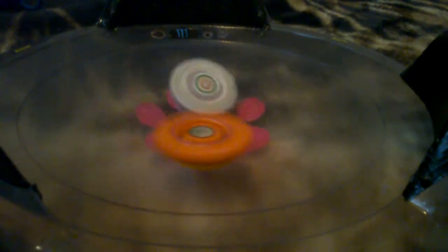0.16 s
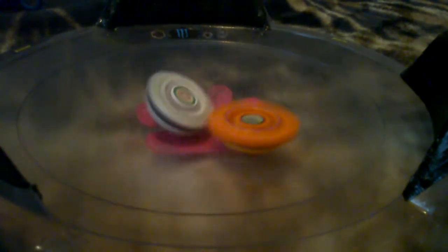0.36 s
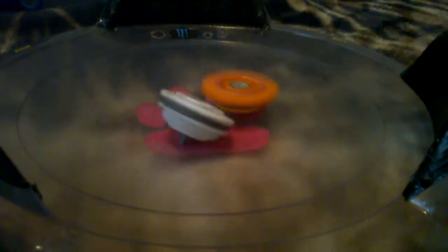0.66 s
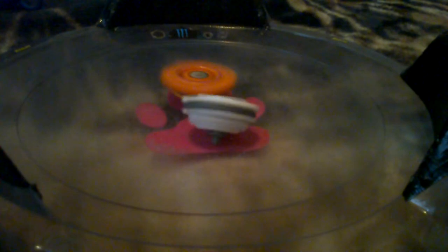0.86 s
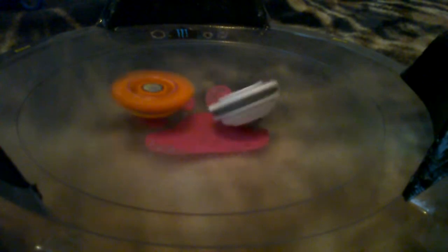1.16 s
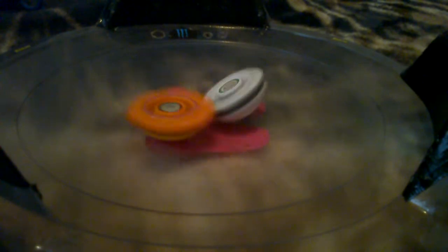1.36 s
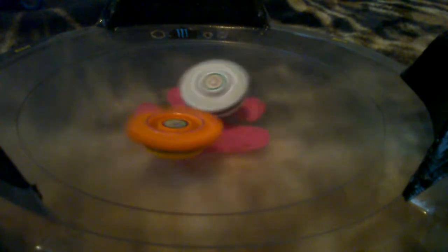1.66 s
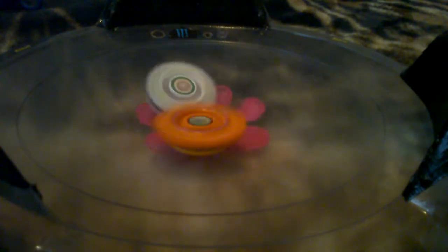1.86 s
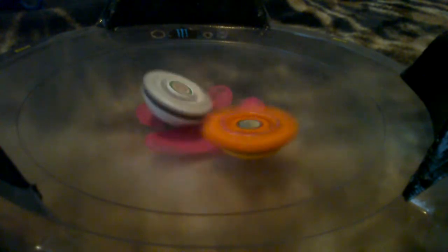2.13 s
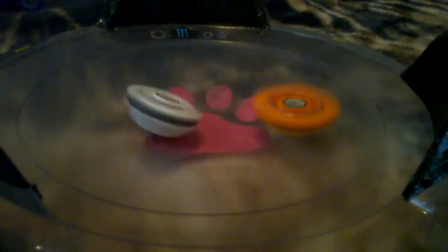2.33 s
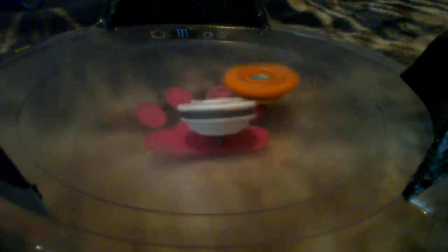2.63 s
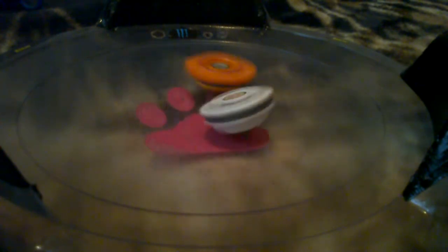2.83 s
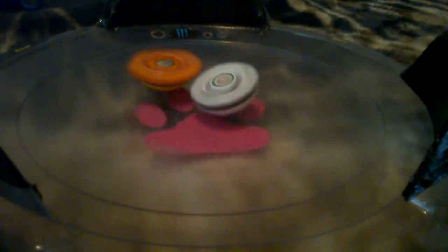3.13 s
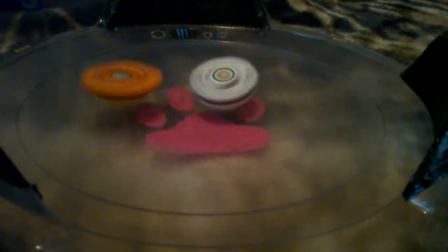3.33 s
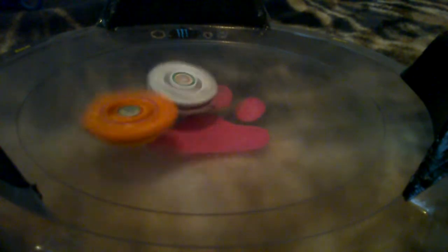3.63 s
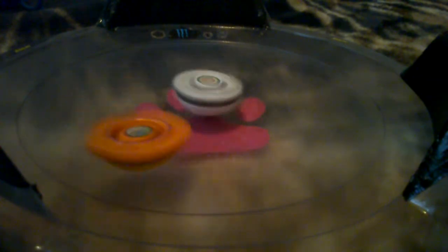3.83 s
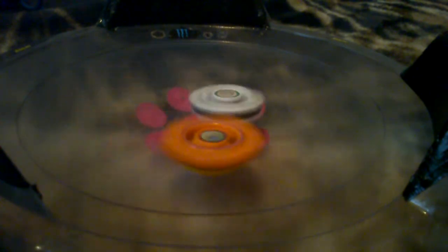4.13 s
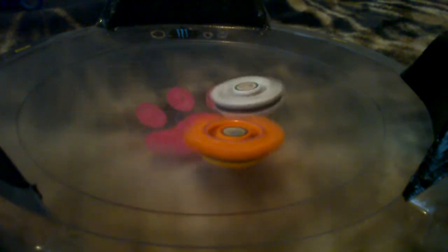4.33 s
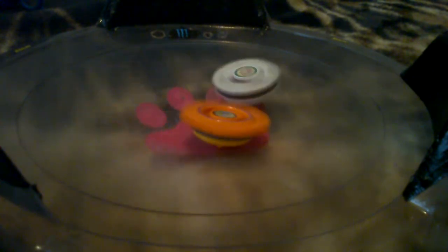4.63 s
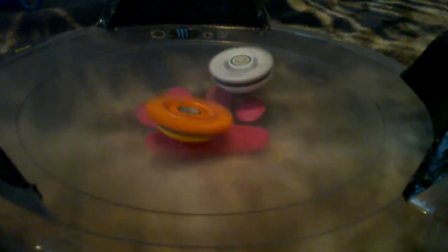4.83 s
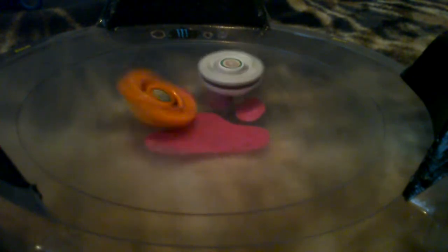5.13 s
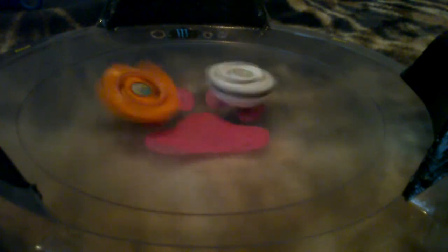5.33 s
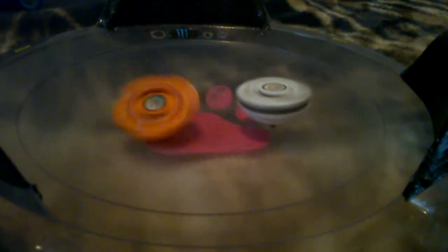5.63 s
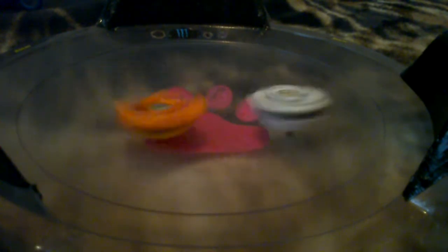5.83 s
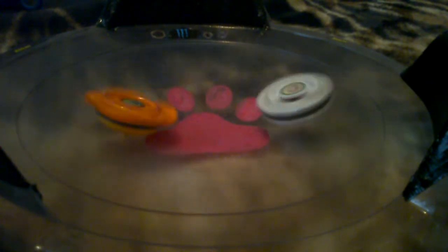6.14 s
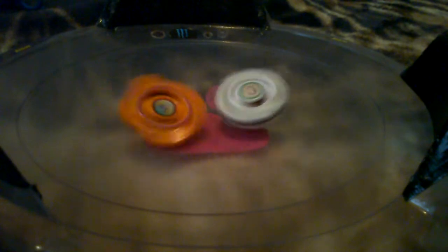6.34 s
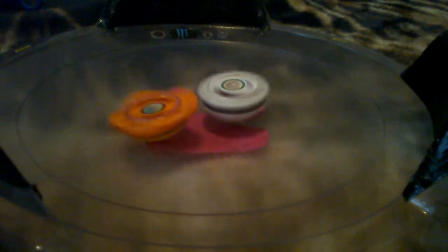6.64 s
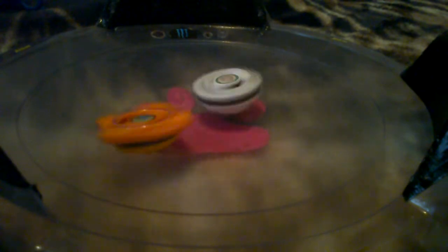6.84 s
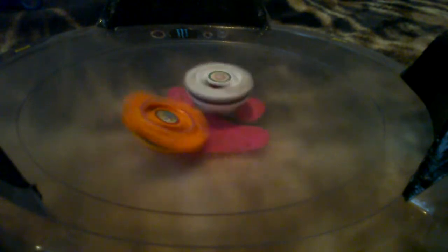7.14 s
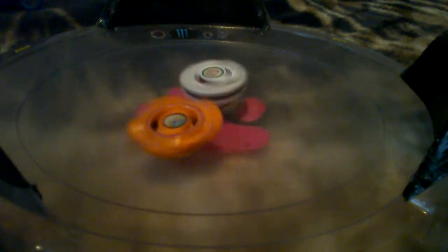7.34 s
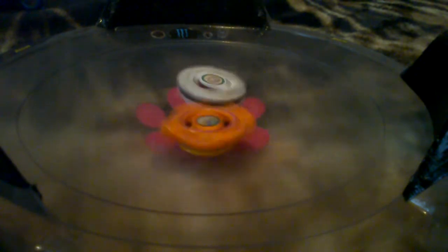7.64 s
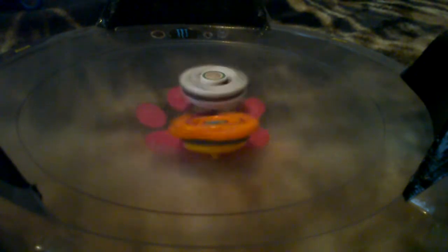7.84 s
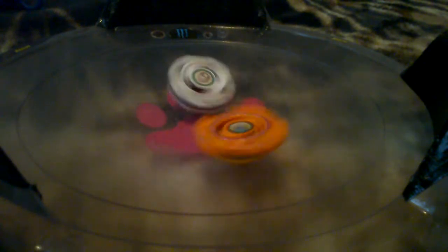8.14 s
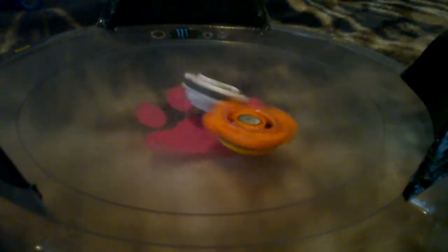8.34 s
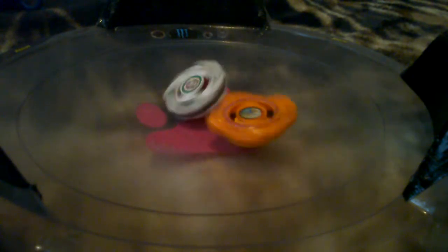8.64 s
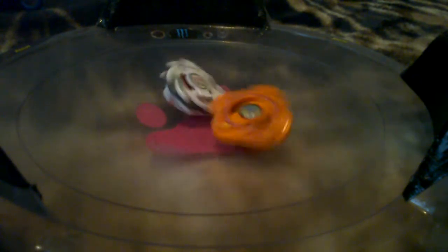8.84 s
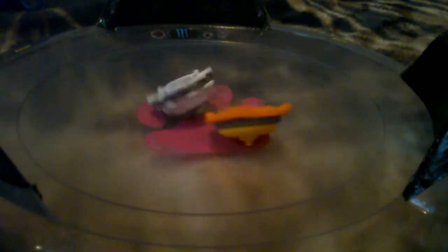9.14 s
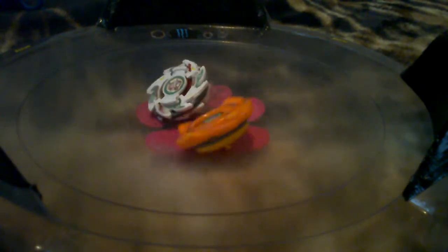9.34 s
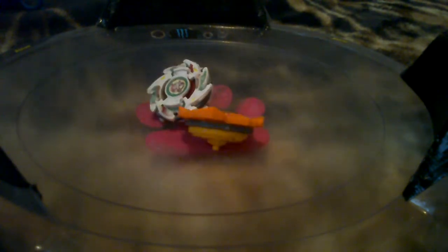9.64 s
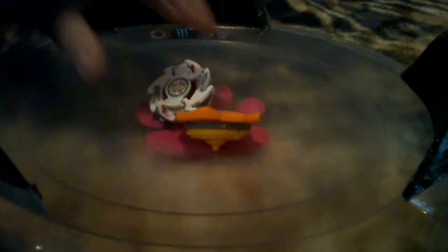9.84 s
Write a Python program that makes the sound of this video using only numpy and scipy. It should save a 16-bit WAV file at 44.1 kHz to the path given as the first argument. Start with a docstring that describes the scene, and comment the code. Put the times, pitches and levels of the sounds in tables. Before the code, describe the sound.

Close up in a small room, a tilted spinning top hammers a thin plastic bowl in a fast hollow rattle for about a second and a half. Sharp bright cracks follow as two tops clash, with fainter rapid tapping until three seconds. Then come scattered clashes over lumpy low rumble and rounded bumps, finishing in smaller, weaker clicks. A small camera microphone adds faint hiss and brief level dips.

```python
"""Quick hammering, sharp plastic cracks and low rumbling bumps: two spinning tops in a thin plastic bowl,
close to a small camera microphone in a small room. A tilted top hammers the bowl about once a turn, ringing its
decaying modes; clashing rims grind in short noise bursts; tips roll as lumpy noise and rock the bowl in rounded
low cycles. The room answers blows and clashes with noise tails, and the level dips briefly at times."""
import sys
import numpy as np
from scipy import signal
from scipy.fft import rfft, irfft, next_fast_len
from scipy.io import wavfile
from scipy.ndimage import uniform_filter1d, map_coordinates

SR = 44100
rng = np.random.default_rng(int(sys.argv[2]) if len(sys.argv) > 2 else 0)


def to_wav(sig):
    """Store sig (one row per channel, or 1-D mono) as 16-bit WAV at the path in sys.argv[1].

    Samples outside -1..1 are clipped; the rate is SR.
    """
    pcm = np.clip(np.atleast_2d(sig), -1, 1) * 32767
    pcm = np.round(pcm).astype(np.int16)
    wavfile.write(sys.argv[1], SR, pcm.T)  # frames by channels


N = 440541

# tips rolling on the floor: (time [s], rumble level [dB], whir level [dB])
ROLLING_LEVELS = [(0, -45, -41.5), (1.2, -40, -43.5), (1.6, -44.5, -44), (2.9, -44.5, -47),
                  (3.1, -35, -52.5), (3.5, -42, -61.5), (4.3, -41.5, -60.5), (5.0, -37, -56),
                  (5.3, -40.5, -47), (5.6, -42, -52.5), (6.0, -37.5, -48.5), (6.3, -41, -50.5),
                  (6.9, -47, -55.5), (7.3, -40, -52), (7.9, -43, -60.5), (8.8, -34, -48.5),
                  (9.1, -42.5, -56), (9.99, -44.5, -62)]
# spectra of the rolling: (frequency [Hz], relative density [dB per Hz])
RUMBLE_SPECTRUM = [(15, -28.5), (35, -4), (80, 2.5), (200, -3.5), (460, -24.5), (900, -54.5), (1500, -120)]
WHIR_SPECTRUM = [(240, -34), (400, -1), (1300, -5.5), (3300, -18.5), (5500, -22.5), (9500, -25),
                 (15500, -34.5)]
# runs of hammering: (first blow [s], end [s], first turn lasts [s], each turn longer by [s])
HAMMER_RUNS = [(0.012, 0.17, 0.0368, 0), (0.2005, 1.39, 0.0371, 0.00016), (1.555, 2.25, 0.0425, 0),
               (2.327, 3.02, 0.0474, 0.00014)]
# strength of the hammering: (time [s], relative thump level [dB])
HAMMER_FORCE = [(0.012, -10), (0.07, -23.5), (0.13, -18.5), (0.21, -10), (0.35, -14), (0.53, -14.5),
                (0.8, -9.5), (1.15, -10), (1.24, -16), (1.39, -9.5), (1.55, -21), (2.2, -23.5), (2.45, -27),
                (2.62, -24.5), (3.0, -27)]
# bowl modes: (frequency [Hz], hard-blow level [dB], light-touch level [dB], t60 [s]), levels relative
BOWL_MODES = [(88.9, -15.5, -1.5, 0.211), (163.4, 0, 0, 0.11), (224.2, -4.5, -0.5, 0.081),
              (269.4, -0.5, -9.5, 0.041), (328.9, -6, -5, 0.065), (378.5, -19, -11, 0.22),
              (706, -19.5, -14, .09), (1092, -10, -17, 0.035)]
# spectra of the hard contact, bright crack and dull knock: (frequency [Hz], relative density [dB per Hz])
TICK_SPECTRUM = [(300, -20), (800, 0.5), (3000, -5.5), (9500, -15), (13000, -29.5)]
CRACK_SPECTRUM = [(1300, -33), (2200, -6), (3400, 1.5), (5700, 0), (9400, 4), (12000, -11.5),
                  (15500, -22.5), (17000, -40)]
DULL_SPECTRUM = [(220, -23.5), (450, -1.5), (1500, 0.5), (2500, -5), (5000, -26)]
# decay of the room: (frequency [Hz], t60 [s])
ROOM_DECAY = [(200, 0.41), (1400, 0.28), (4000, 0.22), (10000, 0.23), (15000, 0.068)]
# rim against rim or floor: (time [s], relative crack level [dB], relative thump level over the crack [dB])
RIM_CLASHES = [(1.4056, 2.5, -18.5), (1.416, -7, -25), (1.4235, -9, -22), (1.4462, 1, -13),
               (1.4651, 2, -28), (1.4848, -13, -5), (1.5077, -9, -4.5), (1.9089, -5, -12.5),
               (1.9205, 4.5, -20), (1.9341, -3, -14), (1.9543, -7, -7.5), (2.2694, 3, -13.5),
               (2.791, 0.5, -9.5), (2.809, -7, -9.5), (2.8241, -18.5, 2.5), (3.2259, -10, -12),
               (3.6888, -1, -14.5), (4.1171, -10, -10.5), (4.1887, -12, -8), (4.3439, -10, -17.5),
               (4.5351, -12, -12.5), (4.7567, -1, -13), (4.7715, -14, -10), (5.1028, -2.5, -13.5),
               (5.122, -16, -6.5), (5.254, -33.5, -5), (5.334, -31, 2), (5.3467, 4, -14.5),
               (5.385, -12, -3), (5.4105, -7.5, -14.5), (5.73, -41.5, 0.5), (5.776, -29.5, 3),
               (5.7923, -20, -17), (5.8304, -15, -8), (5.8488, 1, -15.5), (5.873, -19, -0.5),
               (5.9297, -18.5, 1.5), (5.9441, -9, -13), (5.9598, -17.5, -4.5), (6.0146, -27.5, 1.5),
               (6.4047, -30, 6), (6.416, -33, 13), (6.4221, 0, -7.5), (6.4618, -14, -14), (6.49, -30, -5),
               (6.568, -18, -17), (6.5767, -8.5, -10), (6.5953, -15, -6.5), (6.801, -15, -13.5),
               (6.847, -25.5, -10.5), (6.961, -38.5, -6), (7.171, -43, -7), (7.2548, -2, -13),
               (7.698, -5.5, -11), (7.7306, -22, -7.5), (7.92, -45.5, -12.5), (7.9939, -3.5, -15.5),
               (8.2756, -32.5, 12), (8.3548, -19, -0.5), (8.3965, -14.5, -11.5), (8.4186, -29, 11),
               (8.583, -37, 8.5), (8.602, -42, -1), (8.622, -13.5, -12), (8.659, -33, 10),
               (8.6932, -17.5, 0.5), (8.7786, -27.5, 3.5), (8.7976, -20, -3.5), (8.814, -17.5, -16),
               (8.8526, -18, -13), (8.8647, -8.5, -6.5), (8.91, -31, 6), (8.934, -20, -4.5),
               (9.057, -36.5, -18), (9.137, -35, -6), (9.188, -35, 4.5), (9.2026, -21.5, -6),
               (9.2509, -11, -6), (9.285, -19.5, -8), (9.3246, -22.5, -3.5), (9.425, -40.5, 8.5),
               (9.451, -30, 2), (9.604, -36.5, -3), (9.656, -28, 1), (9.66, -19, -7)]
# ringing of the rim weights: (frequency [Hz], relative level [dB], t60 [s])
RIM_MODES = [(3300, -8, 0.044), (5455, -6.5, .04), (10300, -6.5, 0.047), (9200, -4, 0.11),
             (14500, -6.5, 0.018)]
# brief dips of the level: (start [s], end [s], gain [dB])
LEVEL_DIPS = [(3.039, 3.078, -6.5), (3.375, 3.418, -8.5), (4.065, 4.103, -6.5), (4.235, 4.335, -9),
              (5.495, 5.651, -2), (5.653, 5.729, -24), (6.111, 6.258, -11.5), (6.757, 6.803, -20),
              (7.426, 7.498, -9), (8.249, 8.265, -15), (8.564, 8.583, -17), (8.746, 8.777, -10.5),
              (9.004, 9.047, -13), (9.467, 9.568, -5)]
# stronger bumps of the bowl rocking under the tips: (time of peak [s], relative level [dB], pitch [Hz])
STRONG_BUMPS = [(3.175, -21, 170), (3.199, -22, 195), (3.724, -26, 110), (3.849, -27, 116.7),
                (4.046, -20.5, 174.5), (4.703, -26, 119), (5.129, -26.5, 205), (5.37, -15.5, 285),
                (5.427, -25, 220), (7.093, -19.5, 201), (7.149, -23, 167), (7.413, -27.5, 119),
                (7.82, -20, 123.4), (8.078, -26.5, 171), (8.13, -22, 130.4), (8.184, -23, 163),
                (8.25, -13, 158), (8.422, -25, 210), (8.539, -15, 179), (8.575, -10.5, 135),
                (8.715, -20, 174), (8.923, -28, 187), (8.988, -27, 183), (9.202, -23.5, 140),
                (9.68, -23.5, 124), (9.82, -25.5, 141.7)]
# narrow gaps in the camera microphone's response: (centre [Hz], width [Hz])
MICROPHONE_GAPS = [(3960, 850), (7900, 1200), (12450, 150)]

LIGHT_FROM = 1.5  # s, when the hammering eases to a light touch
UNEVEN_S, UNEVEN_DB = 0.001, 1.33  # scatter of time and strength from blow to blow
# s: every second blow comes twice; then a graze precedes its true landing; then all hard blows double
TWICE_FROM, HOP_FROM, ALL_FROM = 0.56, 0.8, 1.16
REBOUND_S, REBOUND_DB, GRAZE_DB = 0.009, -3, -8  # spacing of a pair, weak second contact, weak first contact
SECOND_TICK_DB = 2  # the second contact of a pair ticks more sharply
DULL_DB, DULL_FOLLOWS = -6, 0.85  # dull part of a clash: offset, and how far it follows the thump
FAINT_FROM, FAINT_TO = 3.3, 9.9  # s, span of the faint bumps
FAINT_DB, FAINT_HZ = -32, 124  # their middle relative level and middle pitch
TOP_HZ = 16500  # upper band limit, 26 dB down


def amp(db):
    """Decibels to a linear factor."""
    return 10 ** (np.asarray(db) / 20)


def unit(x):
    """Scale to rms 1."""
    return x / np.sqrt(np.mean(x ** 2) + 1e-20)


def along(points, hz):
    """Read (frequency [Hz], value) points on a log frequency axis."""
    f, v = np.transpose(points)
    return np.interp(np.log(hz + 1), np.log(f + 1), v)


def filtered(x, response):
    """Multiply the spectrum by a response of frequency."""
    m = next_fast_len(len(x) + 8192)
    spectrum = rfft(x, m) * response(np.fft.rfftfreq(m, 1 / SR))
    return irfft(spectrum, m)[:len(x)]


def noise(spectrum):
    """Coloured noise of rms 1."""
    return unit(filtered(rng.standard_normal(N), lambda hz: amp(along(spectrum, hz))))


def wobble(rate):
    """A smooth random curve with rate knots a second."""
    knots = rng.standard_normal(int(N * rate / SR) + 4)
    return map_coordinates(knots, [np.arange(N) * rate / SR])


def bursts(times, levels_db, hold, t60):
    """Envelope of blows that each grind for hold seconds, then die away."""
    t = np.arange(SR // 8) / SR
    hits = np.bincount(np.round(times * SR).astype(int), amp(levels_db), N)[:N]
    shape = (1 - np.exp(-t / 0.00023)) * amp(-60 * np.maximum(t - hold, 0) / t60)
    return signal.fftconvolve(hits, shape)[:N]


def rings(times, levels_db, modes, scatter_db, attack, detune):
    """Each blow rings the same modes at new strengths, slightly bent by how the part is held."""
    out, t = np.zeros(N + SR), np.arange(SR // 8) / SR
    hz, db, t60 = np.transpose(modes)[:, :, None]
    decay = amp(db - 60 * t / t60) * (1 - np.exp(-t / attack))
    chance = rng.standard_normal((len(times), 2, len(modes)))
    for s, level_db, (strength, bend) in zip(times, levels_db, chance):
        waves = np.sin(2 * np.pi * hz * (1 + detune * bend[:, None]) * t) * decay
        start = round(s * SR)
        out[start:start + len(t)] -= amp(level_db + scatter_db * strength) @ waves
    return out[:N]


def high_pass(x, corner_hz):
    """Second-order bass cut."""
    return filtered(x, lambda f: -f * f / (corner_hz ** 2 - f * f + 1j * np.sqrt(2) * f * corner_hz))


def rolling():
    """Tips rub along the floor: a lumpy low rumble with a slightly grainy whir above it."""
    s, rumble_db, whir_db = np.transpose(ROLLING_LEVELS)
    t = np.arange(N) / SR
    lumps = amp(4.0 * wobble(18))
    rumble = amp(np.interp(t, s, rumble_db)) * unit(lumps * noise(RUMBLE_SPECTRUM))
    grain = amp(1.2 * wobble(9) + 1.2 * wobble(60) + 1.5 * wobble(400))
    whir = amp(np.interp(t, s, whir_db)) * unit(grain * noise(WHIR_SPECTRUM))
    return rumble + whir


def microphone_hiss():
    """The microphone's own steady faint hiss, unaffected by the level dips."""
    return amp(-72.0) * noise(WHIR_SPECTRUM)


def hammer_blows():
    """Times, strengths and second-contact marks of a tilted top striking once a turn, sometimes in pairs."""
    k = np.arange(40)
    runs = []
    for first, end, turn, longer in HAMMER_RUNS:
        run = first + turn * k + longer * k * (k - 1) / 2
        runs.append(run[run < end])
    s = np.concatenate(runs)
    chance = rng.standard_normal((len(s), 2))
    db = np.interp(s, *np.transpose(HAMMER_FORCE)) + UNEVEN_DB * chance[:, 0]
    s = s + UNEVEN_S * chance[:, 1]

    odd = np.arange(len(s)) % 2 == 1
    twice = (odd & (s > TWICE_FROM) | (s > ALL_FROM)) & (s < LIGHT_FROM)
    hop = twice & odd & (s > HOP_FROM)  # a graze, then the true landing
    first_db = db + GRAZE_DB * hop
    second_db = db + REBOUND_DB * ~hop
    times = np.r_[s, s[twice] + REBOUND_S]
    levels_db = np.r_[first_db, second_db[twice]]
    second = np.r_[0 * s, np.ones(twice.sum())]
    return times, levels_db, second


def knocks():
    """The bowl floor thumps; the hard contact adds a short tick, then the rim chatters unevenly."""
    s, db, second = hammer_blows()
    hard, modes = s < LIGHT_FROM, np.array(BOWL_MODES)
    hard_modes, light_modes = modes[:, [0, 1, 3]], modes[:, [0, 2, 3]]
    thump = rings(s[hard], db[hard] - 5.5, hard_modes, scatter_db=3.0, attack=0.00012, detune=0.0047)
    thump += rings(s[~hard], db[~hard] - 6.5, light_modes, scatter_db=2.0, attack=0.0003, detune=0.006)

    tick_db = db - 13.5 + SECOND_TICK_DB * second + 0.62 * rng.standard_normal(len(s))
    tick = bursts(s, tick_db, hold=0.0023, t60=0.0092) * noise(TICK_SPECTRUM)
    uneven = unit(amp(3.7 * wobble(130)))
    chatter = bursts(s, tick_db - 15.0, hold=0.014, t60=0.045) * uneven * noise(TICK_SPECTRUM)
    shake_db = np.where(hard, tick_db - 23.0, tick_db - 11.0)
    shake = bursts(s, shake_db, hold=0.002, t60=0.027) * noise(CRACK_SPECTRUM)
    return thump, tick + chatter + shake


def room(x):
    """Noise tails in which each frequency dies at its own speed; a new tail every 0.2 s as the tops move."""
    out, step = np.zeros(N + SR), SR // 5
    for k in range(0, N, step):
        hz, t, z = signal.stft(rng.standard_normal(SR // 3), SR, nperseg=256)
        decay = amp(-60 * t / along(ROOM_DECAY, hz)[:, None])
        tail = signal.istft(z * decay, SR, nperseg=256)[1]
        wet = signal.fftconvolve(x[k:k + step], tail / np.linalg.norm(tail))
        out[k:k + len(wet)] += wet
    return out[:N]


def clashes():
    """Toothed rims grind briefly, loose parts rattle on, the rim weights ring and the bowl thumps."""
    s, db, thump_db = np.transpose(RIM_CLASHES)
    crack = bursts(s, db - 7.5, hold=0.0034, t60=0.01) * noise(CRACK_SPECTRUM)
    loose = unit(amp(6.5 * wobble(110)))
    rattle = bursts(s, db - 24.5, hold=0.012, t60=0.099) * loose * noise(CRACK_SPECTRUM)
    dull_db = DULL_DB + DULL_FOLLOWS * thump_db
    dull = bursts(s, db + dull_db - 8, hold=0.0041, t60=0.041) * noise(DULL_SPECTRUM)
    upper = np.array(BOWL_MODES)[2:, [0, 1, 3]]  # a sideways blow leaves the lowest modes alone
    thump = rings(s, db + thump_db - 4.0, upper, scatter_db=2.5, attack=0.00044, detune=0.06)
    ringing = rings(s, db - 31, RIM_MODES, scatter_db=-3.0, attack=0.00058, detune=0.0057)
    return thump, crack + rattle + dull + ringing


def level_dips():
    """Gain that falls within a few milliseconds and returns."""
    t = np.arange(N) / SR
    db = sum(depth * ((t > start) & (t < end)) for start, end, depth in LEVEL_DIPS)
    return amp(uniform_filter1d(db, size=132))  # 3 ms ramps


def bumps():
    """The bowl rocks under the tips: a few rounded cycles, a short overtone and a puff of scraping."""
    out, t = np.zeros((2, N + SR)), np.arange(-SR // 25, SR // 12) / SR
    rows = np.r_[STRONG_BUMPS, faint_bumps(count=24)]
    phase = rng.uniform(0, 2 * np.pi, (len(rows), 2))
    for (s, db, hz), (p, q) in zip(rows, phase):
        swell = np.where(t < 0, np.exp(-(t * hz / 0.55) ** 2), np.exp(-t * hz / 0.7))
        overtone = 0.24 * swell * np.cos(2 * np.pi * 2.1 * hz * t + q)
        wave = np.cos(2 * np.pi * hz * t + p) + overtone
        k = round((s + t[0]) * SR)
        out[:, k:k + len(t)] += amp(db) * swell * wave, amp(db) * swell
    cycles, puffs = out[:, :N]
    return amp(4.5) * cycles + amp(-27.5) * puffs * noise(DULL_SPECTRUM)


def faint_bumps(count):
    """Weaker rocking among the strong bumps, scattered in time, strength and pitch."""
    u = rng.uniform(0, 1, (count, 3))
    s = FAINT_FROM + (FAINT_TO - FAINT_FROM) * (np.arange(count) + u[:, 0]) / count
    db = FAINT_DB + 5 * (u[:, 1] - 0.5)
    hz = FAINT_HZ * 1.4 ** (u[:, 2] - 0.5)
    return np.c_[s, db, hz]


def scene():
    """The tops and the bowl with the room's answer, over the microphone hiss."""
    knock, tick = knocks()
    thump, clash = clashes()
    bowl = high_pass(knock + thump, corner_hz=99.4)  # a small bowl radiates no deep bass
    tail = room(amp(-10.5) * clash + amp(-13) * tick + amp(-12.5) * bowl)
    tops = bowl + tick + clash + bumps() + tail + rolling()
    return (tops * level_dips() + microphone_hiss())[None]


def microphone_gaps(f):
    """Response of the camera microphone: a product of narrow notches."""
    notches = [(c * c - f * f) / (c * c - f * f + 1j * f * w) for c, w in MICROPHONE_GAPS]
    return np.prod(notches, axis=0)


def band_limit(hz):
    """Steep treble cut around the upper limit."""
    corners = [TOP_HZ - 1300, TOP_HZ - 900, TOP_HZ, TOP_HZ + 300]
    return amp(np.interp(hz, corners, [0, -16, -26, -90]))


def record(dry):
    """Gaps in the microphone response, rounded clipping at full scale and the band limit."""
    x = filtered(dry[0], microphone_gaps)
    x = x / (1 + np.abs(x) ** 8) ** (1 / 8)
    return filtered(x, band_limit)[None]


dry = scene()
out = record(dry)
to_wav(out)
```